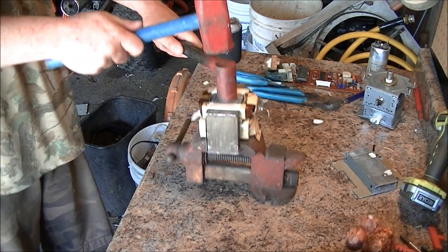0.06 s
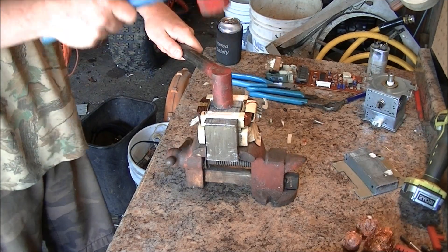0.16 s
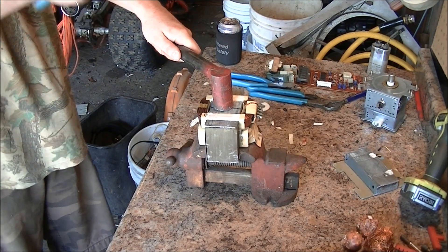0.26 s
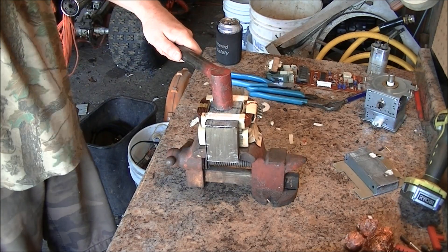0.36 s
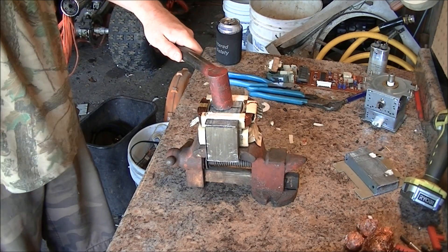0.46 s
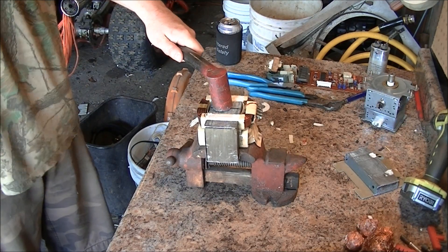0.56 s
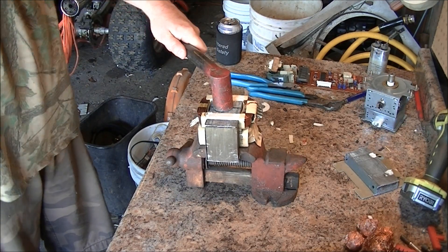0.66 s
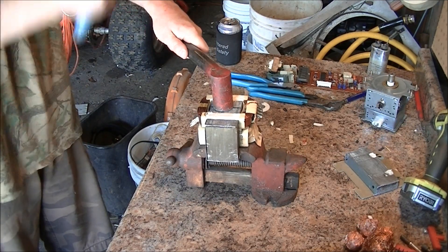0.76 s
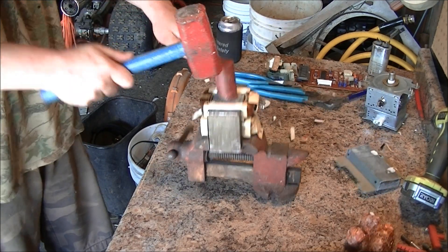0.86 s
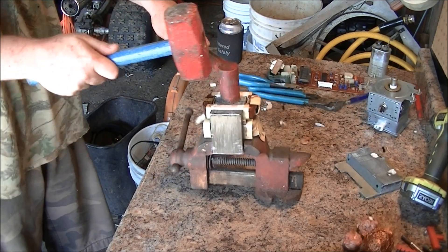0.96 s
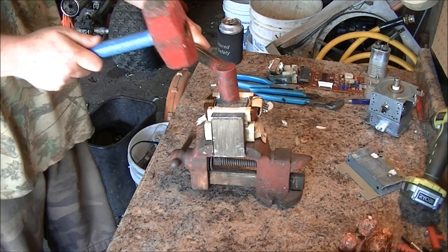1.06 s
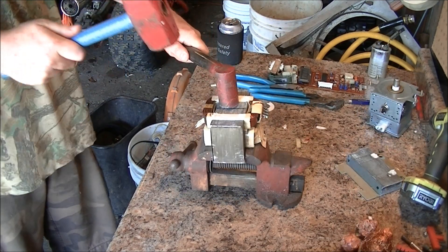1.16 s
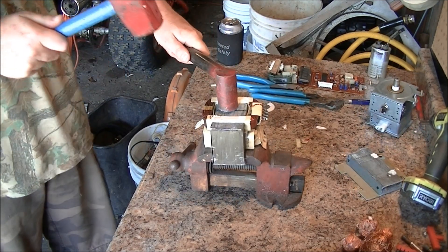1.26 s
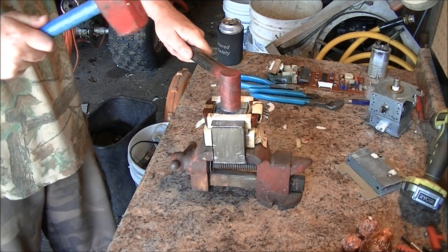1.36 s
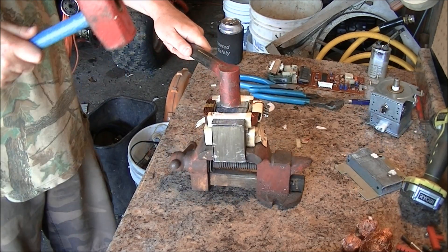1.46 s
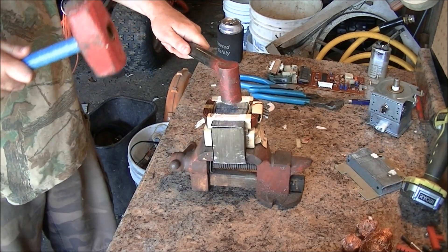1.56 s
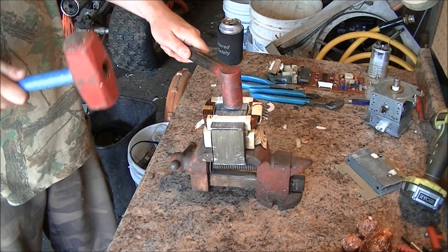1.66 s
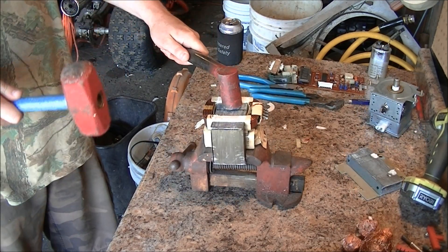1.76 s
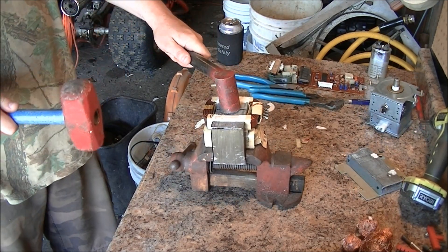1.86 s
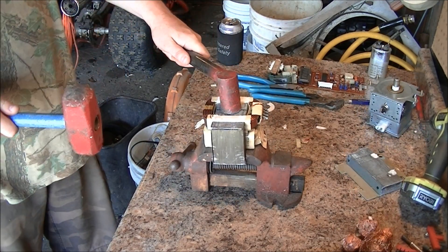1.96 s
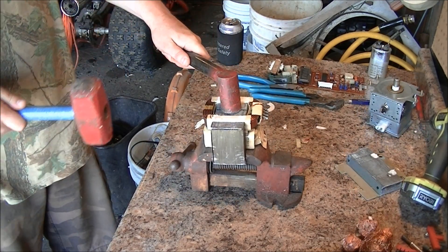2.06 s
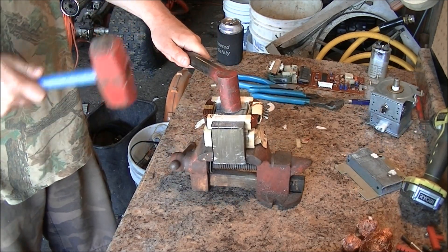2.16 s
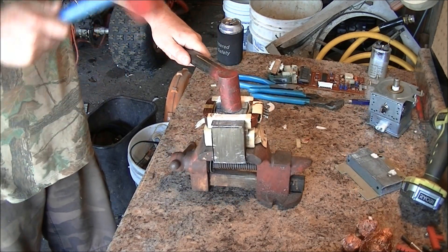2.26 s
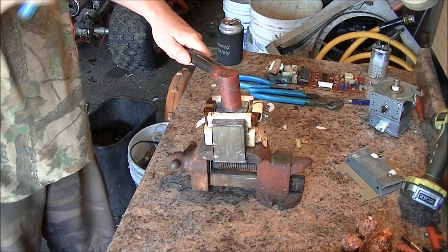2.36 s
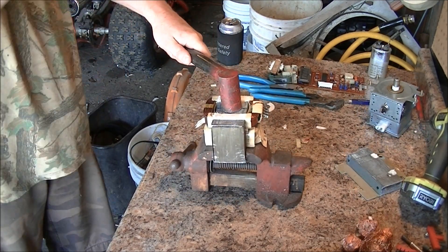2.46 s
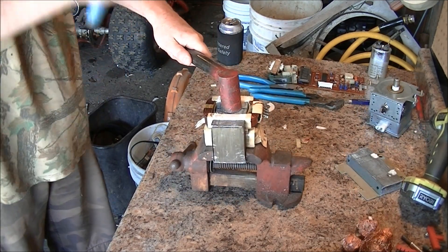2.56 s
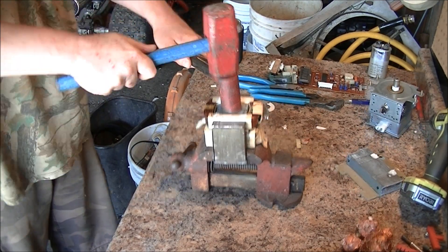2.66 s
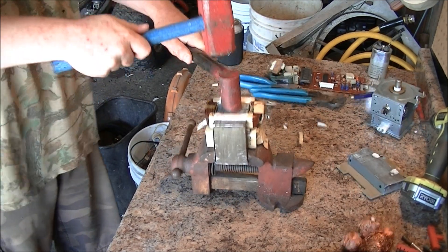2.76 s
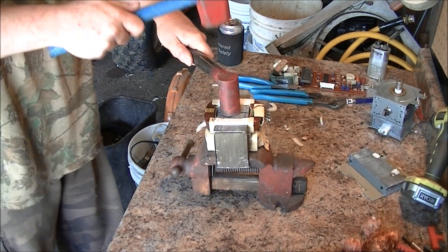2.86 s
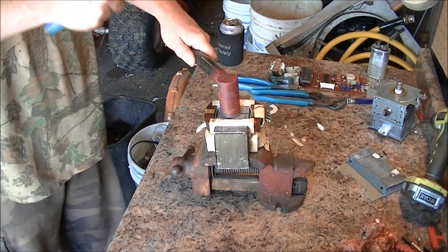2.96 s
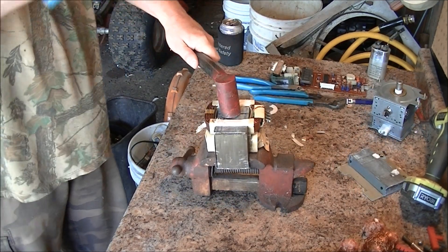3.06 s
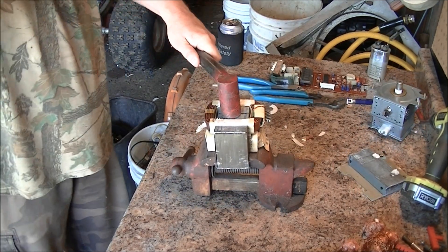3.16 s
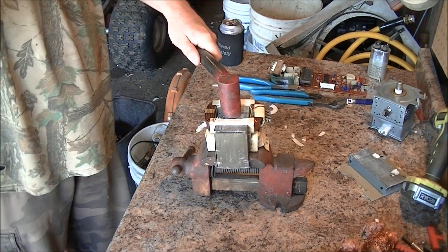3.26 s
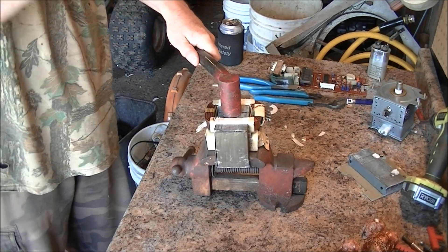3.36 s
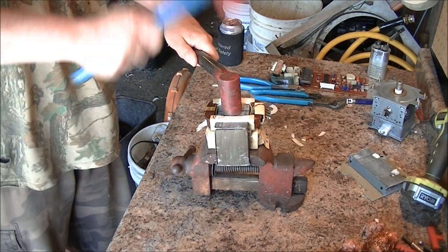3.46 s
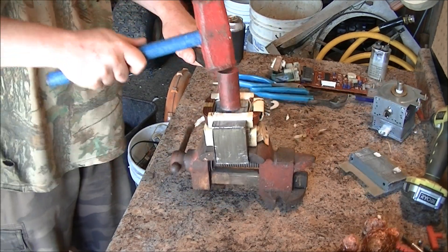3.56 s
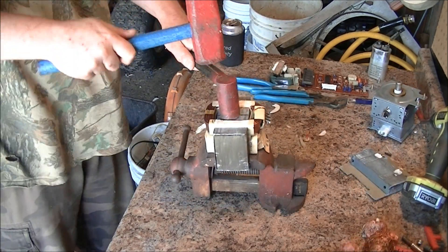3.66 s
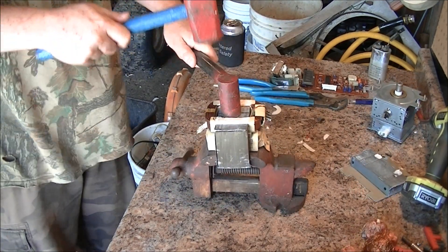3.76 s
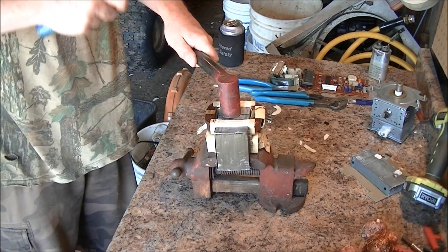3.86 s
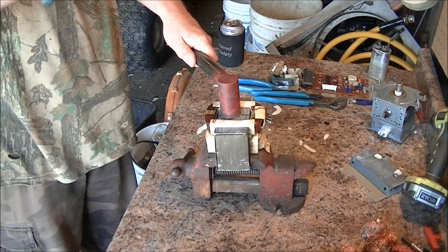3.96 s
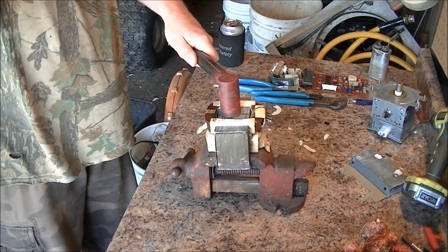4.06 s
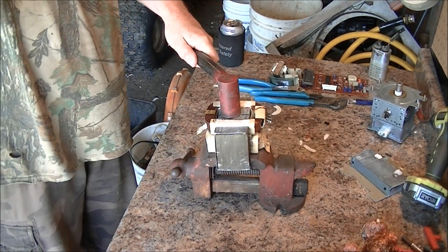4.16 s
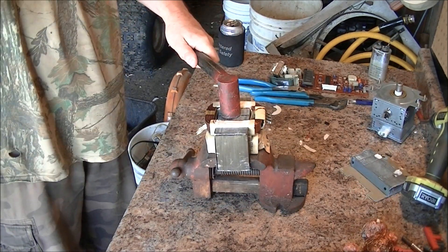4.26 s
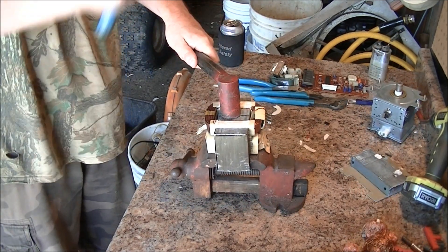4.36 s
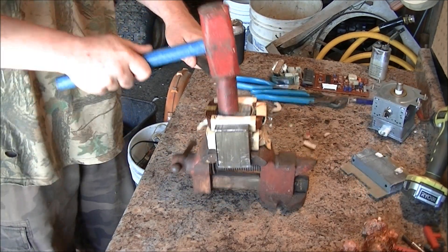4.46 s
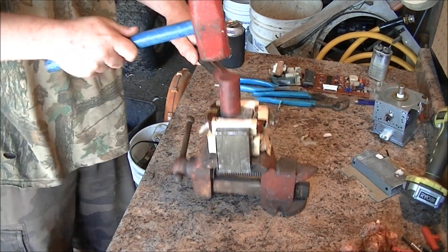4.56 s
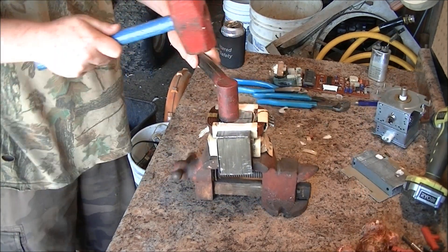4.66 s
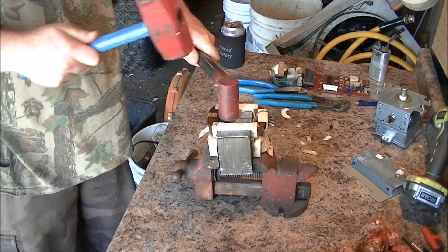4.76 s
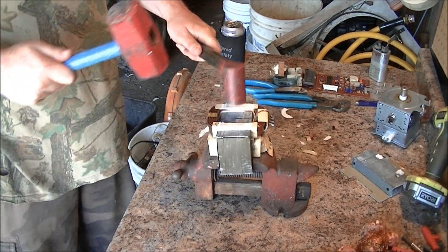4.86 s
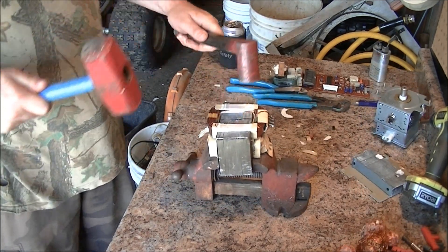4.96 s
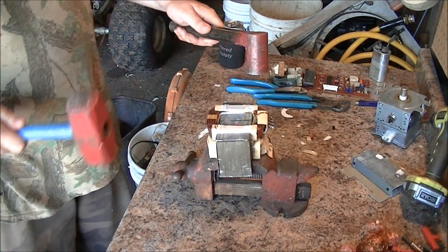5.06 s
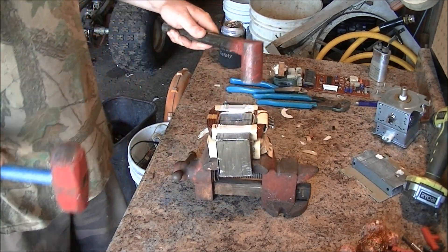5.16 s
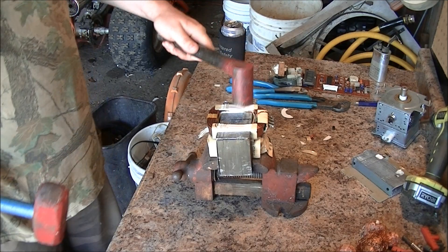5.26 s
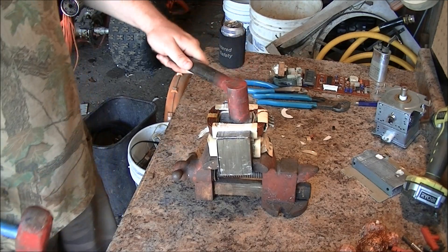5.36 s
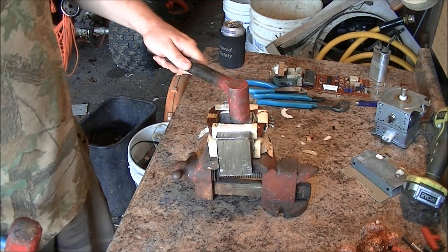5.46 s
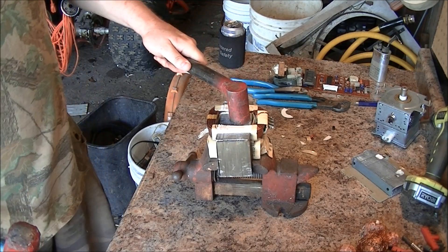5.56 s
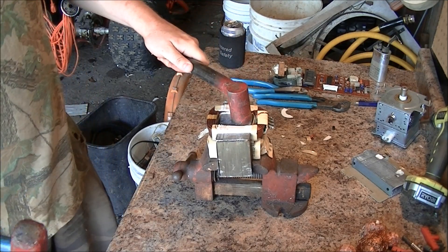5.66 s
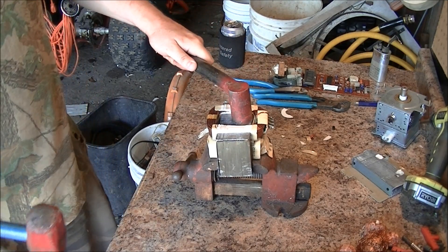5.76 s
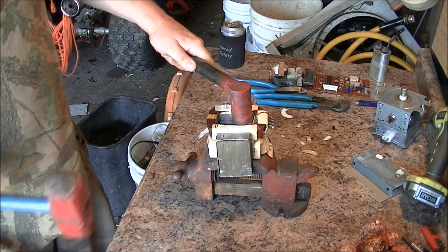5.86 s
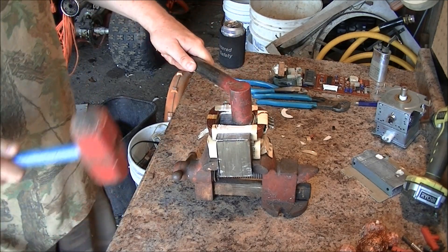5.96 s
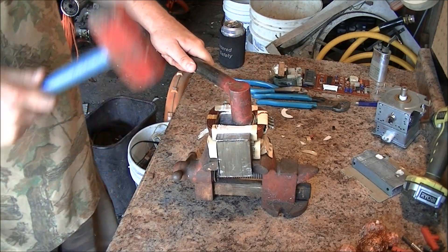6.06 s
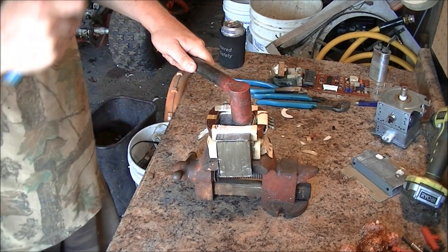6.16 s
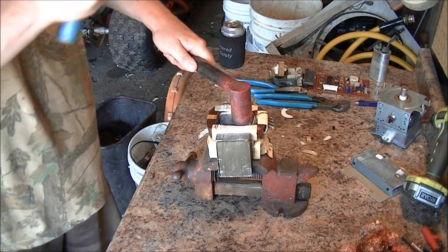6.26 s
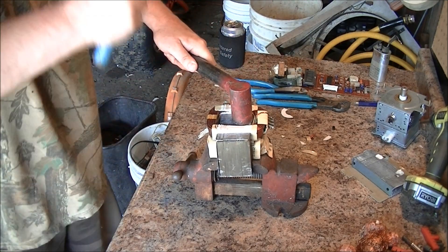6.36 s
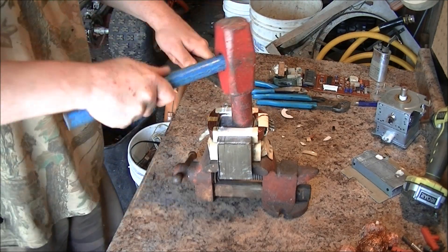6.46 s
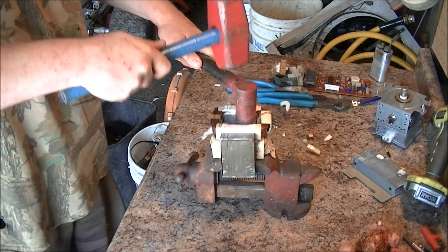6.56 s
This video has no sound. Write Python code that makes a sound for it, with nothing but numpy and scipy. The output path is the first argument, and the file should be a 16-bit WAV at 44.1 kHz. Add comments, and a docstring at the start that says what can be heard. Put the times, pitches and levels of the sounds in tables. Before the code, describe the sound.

Sharp, heavy metal strikes at uneven gaps, two quick, then a pause, then about one per second, and another pause before the final hit. Every strike jolts the bench into a burst of clattering loose steel, with thin high tinks and short singing tones from the vise handle as it bounces. Fan noise hums beneath. The sound is close and dry with a short room echo, and the loudest hits overload.

```python
"""In a shed with a humming fan, a sledge strikes a steel punch standing on a core in a bench vise. Each blow
cracks as a noise burst over struck partials, and the punch rings in broad noisy modes. The bench shakes: loose
parts rattle as dense resonant clicks for a third of a second, tools and scraps land. The vise handle bounces,
singing in short wavering tones and ringing its seat; small steel parts tink and the punch rings high now and
then. The punch scrapes into place, a short echo and fan noise surround it all, and the recorder overloads."""
import sys
import numpy as np
from scipy import signal
from scipy.fft import rfft, irfft
from scipy.io import wavfile

SR = 44100
rng = np.random.default_rng(int(sys.argv[2]) if len(sys.argv) > 2 else 0)


def gain_from_decibels(decibels):
    """Convert decibel values to linear amplitude factors."""
    exponent = np.asarray(decibels, float) / 20
    return 10 ** exponent


def wav_out(sig):
    """Save sig, one row per channel (or a flat mono array), as 16-bit PCM at SR to the path in sys.argv[1]."""
    wavfile.write(sys.argv[1], SR, np.round(np.clip(np.atleast_2d(sig).T, -1, 1) * 32767).astype(np.int16))


N = 291501


def rms_one(x):
    """Scale to unit rms."""
    return x / np.sqrt(np.mean(x ** 2) + 1e-20)


def log_between(hz, centres, levels):
    """Levels (last axis = centres) read at one pitch on a log-frequency axis."""
    place = np.interp(np.log(hz), np.log(centres), np.arange(len(centres)))
    low = min(int(place), len(centres) - 2)
    return levels[..., low] + (place - low) * (levels[..., low + 1] - levels[..., low])


def band(x, low_hz, high_hz):
    """Band-pass."""
    edges_hz = [low_hz, min(high_hz, 0.45 * SR)]
    return signal.sosfilt(signal.butter(2, edges_hz, "band", fs=SR, output="sos"), x)


def resonance(x, hz, width_hz):
    """Two-pole resonance, gain 1 on top."""
    r = np.exp(-np.pi * width_hz / SR)
    feedback = [1, -2 * r * np.cos(2 * np.pi * hz / SR), r * r]
    return signal.lfilter([(1 - r * r) / 2, 0, (r * r - 1) / 2], feedback, x)


def add(out, start_s, piece):
    """Mix a piece in at a time in seconds."""
    at = round(start_s * SR)
    out[at:at + len(piece)] += piece[:N - at]


def decay(hz, t60_s):
    """A struck mode dying away."""
    t = np.arange(round(t60_s * SR)) / SR
    return gain_from_decibels(-60 * t / t60_s) * np.sin(2 * np.pi * hz * t)


# Pitches at which an impact's colour is given: thump, body, bite, edge [Hz]
COLOUR_HZ = [200, 900, 3500, 9500]


def impacts(starts_s, colours_db, t60_1k_s):
    """In every octave eight partials of the struck part ring under a noise burst; lows die more slowly."""
    treble_shortening, contact_s = 0.17, 0.0005
    noise_db, tail_db, tail_stretch = -12, -18, 5.5
    struck_db, struck_share = -11, 0.7
    out = np.zeros(N)
    for hz in 100 * 2.0 ** np.arange(8):
        noise = rms_one(band(rng.standard_normal(N), hz / np.sqrt(2), hz * np.sqrt(2)))
        envelope = np.zeros(N)
        partials_hz = hz * 2 ** rng.uniform(-0.527, 0.517, (len(starts_s), 8))
        signs = rng.choice([-1, 1, 1], (len(starts_s), 8))
        t60_s = t60_1k_s * (1000 / hz) ** treble_shortening
        t = np.arange(round(tail_stretch * t60_s * SR)) / SR
        rise = 1 - np.exp(-(t * hz) ** 2)  # each octave takes a cycle to build up
        fall = gain_from_decibels(-60 * t / t60_s)
        tail = gain_from_decibels(tail_db - 60 * t / t60_s / tail_stretch)  # a faint, slow tail lingers after each burst
        burst = gain_from_decibels(noise_db) * rise * (fall + tail)
        t = t[:round(struck_share * t60_s * SR)]
        ring = gain_from_decibels(struck_db - 60 * t / t60_s / struck_share) * np.sqrt(rise[:len(t)])
        levels_db = log_between(hz, COLOUR_HZ, colours_db)
        for start_s, level_db, own_hz, sign in zip(starts_s, levels_db, partials_hz, signs):
            struck = sign @ np.sin(2 * np.pi * np.outer(own_hz, t))
            add(envelope, start_s + contact_s, gain_from_decibels(level_db) * burst)
            add(out, start_s + contact_s, gain_from_decibels(level_db) * ring * struck)
        out += noise * envelope
    return out


# Sledge on punch: start_s [s], crack_db [dB], shake_db [dB], shake_length [share of the usual]
BLOWS = [(0.036, 0.5, 0, 1.035), (0.9059, 2.7, 0.5, 1.064), (2.7358, 7, 2.7, 1.017),
         (3.5767, 0.7, 2.6, 1.04), (4.519, -0.5, 0.2, 1.03), (6.5478, 2.7, -1, 1.01)]


def cracks():
    """The sledge hits steel: bright impacts that all share one colour."""
    start_s, crack_db = np.transpose(BLOWS)[:2]
    bite_db, t60_1k_s = 1, 0.085
    against_bite_db = np.array([-15, -10, 0, 4.5])  # thump, body, bite, edge
    return impacts(start_s, crack_db[:, None] + bite_db + against_bite_db, t60_1k_s)


# Modes of the punch: pitch_hz [Hz], level_db [dB]
PUNCH = [(3490, -34), (5990, -15), (7080, -23.5), (10300, -22.5), (12200, -55)]


def punch_ring():
    """The punch, damped by pliers and core, rings in rough, broad modes; the first moments are much louder."""
    sharpness, t60_s = 40, 0.42  # sharpness: pitch over width of each resonance
    first_db, first_t60_s = 10, 0.21  # extra at the start, which fades against the ring
    t, envelope = np.arange(SR) / SR, np.zeros(N)
    for start_s, *_ in BLOWS:
        extra = gain_from_decibels(first_db - 60 * t / first_t60_s)
        add(envelope, start_s + 0.00086, gain_from_decibels(-60 * t / t60_s) * (1 + extra))
    noise, ring = rng.standard_normal(N), 0
    for hz, level_db in PUNCH:
        width_hz = hz / sharpness
        mode = resonance(resonance(noise, hz, width_hz), hz, width_hz)
        ring = ring + gain_from_decibels(level_db) * rms_one(mode)
    return envelope * ring


# The shaken bench: each range sags to a turn, drifts until the parts settle, then dies.
# Levels are relative, times are before each blow's stretch.
# pitch_hz [Hz], start_db [dB], turn_db [dB], settle_db [dB], settle_s [s], fall_db_per_s [dB/s]
SHAKE = [(158, -18, -25.5, -25.5, 0.24, 97), (572, -14.5, -17, -23, 0.31, 146),
         (2200, -14, -23.5, -20, .3, 217), (6000, -11.5, -19.5, -23.5, 0.29, 188),
         (11000, -19.5, -20.5, -27, .28, 198)]


def shake_levels():
    """Level in dB of each range of the rattle over time; every blow starts the course anew."""
    turn_s = 0.16
    hum_db, hum_fall_db_per_s = -20, 66  # a faint hum outlasts the rattle
    time, levels_db = np.arange(N) / SR, np.full((N, len(SHAKE)), -120.0)
    for start_s, _, shake_db, stretch in BLOWS:
        since = time >= start_s
        t = (time[since] - start_s) / stretch
        for k, (_, start_db, turn_db, settle_db, settle_s, fall_db_per_s) in enumerate(SHAKE):
            after = np.maximum(t - settle_s, 0)
            dying_db = np.maximum(-fall_db_per_s * after, hum_db - hum_fall_db_per_s * after)
            course_db = np.interp(t, [0, turn_s, settle_s], [start_db, turn_db, settle_db])
            levels_db[since, k] = shake_db + course_db + dying_db
    return levels_db


def rattle():
    """Countless small landings of uneven size, each ringing some cycles at its own pitch, fused by a blur."""
    landings_per_s, size_spread_db, sharpness, blur = 4000, 3.2, 12, 1.1
    share_db = -10.5  # each of the 32 pitches carries a small part of its band
    levels_db, centres_hz = shake_levels(), np.array(SHAKE)[:, 0]
    sizes = gain_from_decibels(size_spread_db * np.minimum(rng.exponential(1, N), 4)) * rng.choice([-1, 1], N)
    clicks = sizes * (rng.random(N) < landings_per_s / SR)
    pitches_hz, dealt, out = np.geomspace(90, 14000, 32), rng.integers(0, 32, N), 0
    for k, hz in enumerate(pitches_hz):
        struck = rms_one(clicks * (dealt == k)) + blur * rng.standard_normal(N)
        # steep skirts: a ping, not a tick
        rung = resonance(resonance(struck, hz, hz / sharpness), hz, hz / 2)
        out = out + gain_from_decibels(log_between(hz, centres_hz, levels_db) + share_db) * rms_one(rung)
    return out


# Single landings of tools and scraps, loud and faint:
# start_s [s], body_db [dB], edge_db [dB against body], thump_db [dB against body]
KNOCKS = [(0.1244, -14, -12, -6), (0.1461, -7.5, 1, 5), (0.1654, -6, -8, 1), (0.1875, -7, -2, -30),
          (0.2354, -1.5, -21, -4), (0.2453, -4, -6, -20), (0.2574, -4, -5.5, -18), (0.2862, -10, -24, -11),
          (0.3182, -5, -19, -9), (0.3694, -28, -5, 5), (0.3925, -28, 0, -20), (0.4474, -37, 7, -14),
          (0.4604, -34, -5, -9), (0.5332, -36, -11, -29), (0.5974, -39, -7, -8), (0.553, -51, 8, -7),
          (0.6335, -50.5, 14, -5), (0.6514, -56, 1, 1), (0.828, -33, -24, -1), (0.8465, -37.5, -10, 14.5),
          (.9767, -19.5, 2.5, -6), (1.0001, -17, -9, -20), (1.0226, -17, 8, -10.5), (1.0384, -9, -4.5, 6),
          (1.0794, -18.5, 7, -2), (1.1109, -18, 8, 5), (1.1354, -29, 18, 21), (1.3404, -32, 7, -4),
          (1.3483, -40, 31.5, 26.5), (1.3638, -19.5, -9, -23), (1.4964, -31, -41, 7),
          (1.5474, -41.5, -22, 12), (1.6254, -39, -40, 11), (1.7524, -30, 12.5, 23.5),
          (1.9061, -15.5, -6.5, 7), (2.8294, -9, -4, -16), (2.8449, -8.5, -0.5, 3), (2.8754, -10.5, 8, 0),
          (2.9184, -12, -2, -8), (2.9322, -8, -9, -31), (2.9474, -21.5, 20, -8), (3.02, -34.5, 10, 15),
          (3.066, -35.5, 6, 17), (3.1094, -31, 12, -5), (3.1714, -42, 8, 13), (3.2834, -34.5, -26, 6),
          (3.6644, -12, -14, -5), (3.689, -4, -4, -30), (3.7084, -3.5, -26, 3), (3.7339, -7, 0, -7),
          (3.7754, -2.5, -42, -4), (3.7878, -2.5, -10, -10), (3.8104, -29, -3.5, 11),
          (3.8462, -24, -9, 7.5), (4.0134, -10, -50, -14), (4.3979, -28.5, -44, 2),
          (4.6194, -4.5, -4.5, -12), (4.629, -5, -19, -46), (4.6594, -8.5, -30, 1), (4.6734, -4, -21, -10),
          (4.7344, -13.5, -25, 7.5), (4.7486, -16, 5, -25.5), (4.8194, -17.5, 1, -25),
          (4.8544, -30.5, 13, 9.5), (4.9144, -42.5, 11.5, -12), (4.9744, -47.5, 14, 16),
          (5.409, -29.5, 16, 22), (5.4196, -8, -9, -34), (5.4299, -2.5, -24, -19), (5.453, -10, -48, -17),
          (5.6854, -50.5, 13, 16), (5.7374, -52, 10, 9), (5.8774, -44, -1, 5)]


def knocks():
    """Tools and scraps land, and the handle cracks on its seat, each impact with a colour of its own."""
    t60_1k_s, edge_share = 0.071, 0.51  # share of the edge that already shows in the bite
    # the handle's crack comes just ahead of its ring: 8 dB up, with little edge or thump
    handle_cracks = [(start_s - 0.001, level_db + 8, -20, -32) for start_s, level_db in LANDINGS]
    start_s, body_db, edge_db, thump_db = np.transpose(KNOCKS + handle_cracks)
    bite_db = body_db + edge_share * edge_db
    colours_db = np.transpose([body_db + thump_db, body_db, bite_db, body_db + edge_db])
    return impacts(start_s, colours_db, t60_1k_s)


# Resonances of bench top and vise: pitch_hz [Hz], width_hz [Hz], added_db [dB added on top]
BENCH = [(163, 4.8, -11), (249, 40, -5.5), (357.6, 31, -1), (620, 10, -27), (864, 110, -5.5),
         (1240, 180, -9), (1492, 230, -5.5), (1798, 20, 5.5), (2075, 200, -10), (2720, 180, -11),
         (4840, 14, -29.5)]


def bench_body(x):
    """Bench top and vise colour what lands on them; little deep bass or extreme treble is radiated."""
    bass_cut_hz, treble_cut_hz = 95, 10000
    x = x + sum(gain_from_decibels(added_db) * resonance(x, hz, width_hz) for hz, width_hz, added_db in BENCH)
    x = signal.sosfilt(signal.butter(3, bass_cut_hz, "high", fs=SR, output="sos"), x)
    return signal.sosfilt(signal.butter(2, treble_cut_hz, fs=SR, output="sos"), x)


# Handle ringing in short stretches: start_s [s], length_s [s], level_db [dB],
# upper_db [dB, upper partials against the first], swell_db_per_s [dB/s]
HANDLE_RINGS = [(.075, 0.06, -22.5, -29, 121), (0.174, 0.11, -29, 7.5, -18), (.282, 0.044, -25.5, -7, -20),
                (1.012, 0.043, -17, -5, 0), (1.166, 0.088, -22, 2.5, -25), (1.240, 0.075, -33, -1, -180),
                (2.79, 0.033, -9.5, -6, 152), (2.87, 0.19, -45, 16.5, -48), (2.95, 0.13, -26, 0.5, -60),
                (3.691, 0.13, -39.5, 15, -15), (3.879, 0.081, -21, -8, -5), (3.946, 0.17, -32, -10, -180),
                (4.683, 0.068, -29, -2, -1), (4.774, 0.13, -20.5, -12, -120)]
# Partials of the handle: pitch_hz [Hz], level_db [dB]
HANDLE = [(5177, 0), (10035, 0), (13740, -19)]


def handle():
    """The bar sings in short stretches of set length; it tumbles, so each partial wavers."""
    waver_points_per_s, waver_db, rise_s, stop_s = 140, 5, 0.008, 0.02
    out = np.zeros(N)
    for start_s, length_s, level_db, upper_db, swell_db_per_s in HANDLE_RINGS:
        t = np.arange(round(length_s * SR)) / SR
        edges = np.clip(np.minimum(t / rise_s, (length_s - t) / stop_s), 0, 1)
        for k, (hz, mode_db) in enumerate(HANDLE):
            waver = np.interp(t * waver_points_per_s, np.arange(64), rng.standard_normal(64))
            partial_db = level_db + mode_db + upper_db * (k > 0)
            gain = gain_from_decibels(partial_db + swell_db_per_s * t + waver_db * waver)
            tone = np.sin(2 * np.pi * hz * t + rng.uniform(0, 2 * np.pi))
            add(out, start_s, gain * edges * tone)
    return out


# The handle drops back on its seat in runs of bounces: start_s [s], level_db [dB]
LANDINGS = [(1.1775, -4.5), (1.24, -12.5), (1.2916, -17.5), (1.309, -20), (2.988, -15), (3.0423, -7),
            (3.073, -16), (3.091, -21), (3.8678, -8), (3.9355, -9.5), (3.9725, -15.5), (3.998, -19),
            (4.7645, -10)]
# Modes of the vise under the handle: pitch_hz [Hz], level_db [dB], t60_s [s]
SEAT = [(816, -4, 0.1), (1045, -9.5, 0.1), (1238, -3, 0.098), (1517, -4.5, 0.067), (1870, -5.5, 0.021),
        (2643, 5.5, 0.015), (4700, -15.5, 0.0039)]


def seat():
    """Every landing rings the same short modes of the vise, each with a strength of its own."""
    out = np.zeros(N)
    strengths_db = rng.normal(0, 1.3, (len(LANDINGS), len(SEAT)))
    for (start_s, level_db), own_db in zip(LANDINGS, strengths_db):
        for (hz, mode_db, t60_s), change_db in zip(SEAT, own_db):
            add(out, start_s, gain_from_decibels(level_db + mode_db + change_db) * decay(hz, t60_s))
    return out


# When each part's ring starts or swells, by part: start_s [s], level_db [dB]
TINKS = {"pin": [(0.12, -36), (.34, -39), (.936, -27), (4.01, -64), (4.57, -50)], "washer": [(.375, -38)],
         "chip": [(.435, -33), (3.108, -33.5), (3.172, -45.5), (4.655, -20.5), (4.855, -25),
         (4.915, -39.5)], "plate": [(1.365, -27), (1.906, -26), (5.421, -22)], "scrap": [(.287, -10),
         (.319, -18), (.37, -23.5), (.393, -26), (.448, -32), (.461, -33), (.533, -34), (.598, -39),
         (.652, -41), (1.001, -13.5), (5.42, -10.5)], "core": [(5.43, -13), (5.454, -19.5)],
         "rod": [(5.441, -28)], "bracket": [(4.79, -14.5)], "pliers": [(.148, -21.5), (.236, -12.5),
         (.257, -7.5), (1.022, -19.5), (2.845, -14.5), (2.882, -15), (2.934, -19), (2.95, -8.5),
         (3.692, -4), (3.734, -5), (3.789, -14), (4.749, -12)]}
# Modes of each ringing part, by part ("chip" holds two high modes of the punch): pitch_hz [Hz], level_db [dB],
# t60_s [s]
PARTS = {"pin": [(11397, 0, .75)], "washer": [(9330, 0, .4)], "chip": [(10250, 0, .06), (12300, -2, .052)],
         "plate": [(3150, 0, .16), (3165, -5, .09), (4000, -1, .09), (5860, -6, .06)],
         "rod": [(5250, 0, .05)], "bracket": [(1880, 0, .2)], "pliers": [(5600, 0, .03), (5900, -2, .025),
         (7400, -8, .02), (4600, -8, .03)], "scrap": [(2900, 0, .03), (3300, -3, .025), (4100, -4, .02),
         (2100, -5, .03)], "core": [(880, 0, .1), (1080, -1, .09), (1300, -3, .09), (1650, -6, .06)]}


def tinks():
    """Lone rings of small steel parts and high rings of the punch, each a sum of decaying modes."""
    out = np.zeros(N)
    for part, rings in TINKS.items():
        for start_s, level_db in rings:
            for hz, mode_db, t60_s in PARTS[part]:
                add(out, start_s, gain_from_decibels(level_db + mode_db) * decay(hz, t60_s))
    return out


# The punch slides into place: time_s [s], level_db [dB]
SCRAPE = [(5.52, -57), (5.82, -48.5), (6.02, -59), (6.1, -75.5)]
# Its broad resonances, relative levels: pitch_hz [Hz], width_hz [Hz], level_db [dB]
SCRAPE_RINGS = [(2250, 300, -2.5), (4160, 200, -7), (4840, 210, -4.5), (5950, 860, -9.5), (7860, 1500, -15)]


def scrape():
    """Fine friction grains in the punch's broad resonances."""
    time_s, level_db = np.transpose(SCRAPE)
    grains = rng.standard_normal(N) ** 3  # cubing makes the noise spiky
    rings = sum(gain_from_decibels(ring_db) * rms_one(resonance(grains, hz, width_hz))
                for hz, width_hz, ring_db in SCRAPE_RINGS)
    gain = gain_from_decibels(np.interp(np.arange(N) / SR, time_s, level_db, left=-120, right=-120))
    return gain * rms_one(rings)


def shed(x):
    """A short diffuse echo of decaying noise, another in each channel."""
    t60_s, level_db = 0.28, -22
    t = np.arange(round(t60_s * SR)) / SR
    echoes = rng.standard_normal((2, len(t))) * gain_from_decibels(-60 * t / t60_s)
    echoes /= np.linalg.norm(echoes, axis=1, keepdims=True)
    return gain_from_decibels(level_db) * signal.fftconvolve(x[None], echoes, axes=1)[:, :N]


# Spectrum of the shed air, relative levels: pitch_hz [Hz], density_db [dB per Hz]
AIR = [(15, -61), (25, -17), (58, -5.5), (87, -57), (117, -17), (175, -9), (212, 1), (285, -13.5),
       (531, -11.5), (624, -11.5), (1370, -13.5), (2690, -24.5), (4740, -29), (16000, -42.5)]
# Loudness of the shed air: time_s [s], level_db [dB in its middle band]
AIR_LEVEL = [(0, -46), (6.61, -47)]
# Hum tones of the fan: pitch_hz [Hz], width_hz [Hz], level_db [dB]
HUM = [(53, 3.9, -55), (125, 10, -46.5), (207, 4.7, -50.5), (250, 30, -59), (488, 29, -59.5)]


def air():
    """Broad fan noise with a few wavering hum tones, nearly the same in both channels."""
    side_db = -20
    hz = np.fft.rfftfreq(N, 1 / SR) + 1
    pitch_hz, density_db = np.transpose(AIR)
    shape = gain_from_decibels(np.interp(np.log(hz), np.log(pitch_hz), density_db))
    mid, side = irfft(rfft(rng.standard_normal((2, N))) * shape, N)
    time_s, level_db = np.transpose(AIR_LEVEL)
    gain = gain_from_decibels(np.interp(np.arange(N) / SR, time_s, level_db)) / np.std(band(mid, 360, 1230))
    hum = sum(gain_from_decibels(tone_db) * rms_one(resonance(rng.standard_normal(N), tone_hz, width_hz))
              for tone_hz, width_hz, tone_db in HUM)
    return hum + gain * (mid + gain_from_decibels(side_db) * side * [[1], [-1]])


def scene():
    """Everything on the bench, its echo and the shed air."""
    landed = bench_body(cracks() + knocks() + rattle())
    bench = landed + punch_ring() + handle() + tinks() + scrape() + seat()
    return bench + shed(bench) + air()


def gain_control(x):
    """Loud peaks pull the gain down a few milliseconds late; it climbs back at a steady rate."""
    limit_db, attack_s, release_db_per_s = -4, 0.0021, 259
    over_db = np.maximum(20 * np.log10(np.abs(x).max(axis=0) + 1e-9) - limit_db, 0)
    climb_db = release_db_per_s * np.arange(N) / SR
    held_db = np.maximum(np.maximum.accumulate(over_db + climb_db) - climb_db, 0)
    r = np.exp(-1 / (attack_s * SR))
    return x * gain_from_decibels(-signal.lfilter([1 - r], [1, -r], held_db))


def top_cut(x):
    """Nothing passes above the cut-off."""
    return signal.sosfilt(signal.butter(12, 16450, fs=SR, output="sos"), x)


def record(dry):
    """The left port hears a little less bass than the right; the gain control lets first peaks clip."""
    bass_tilt = 0.07  # share of the bass taken from the left and added to the right
    bass = signal.lfilter(*signal.butter(1, 500, fs=SR), dry)
    x = gain_control(dry + bass_tilt * bass * [[-1], [1]])
    return top_cut(np.clip(x, -1, 1))


dry = scene()
out = record(dry)
wav_out(out)
```